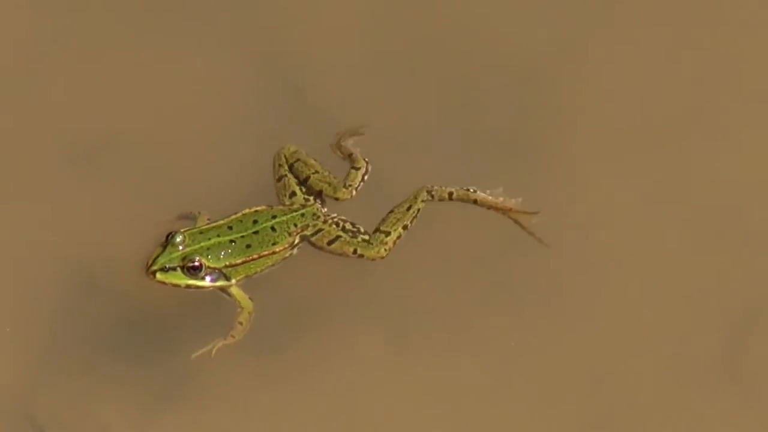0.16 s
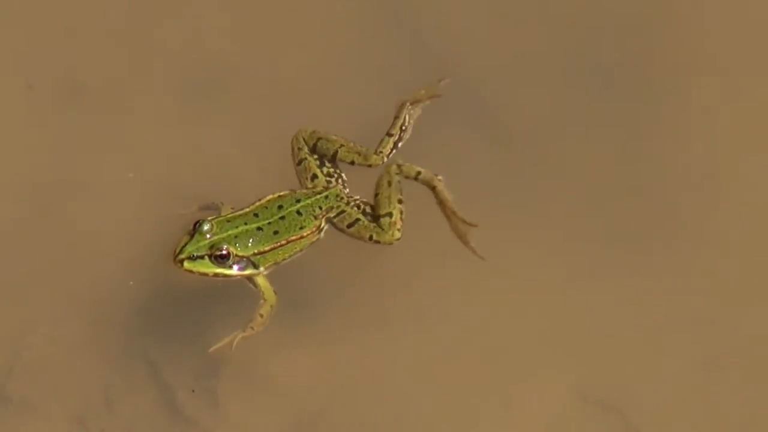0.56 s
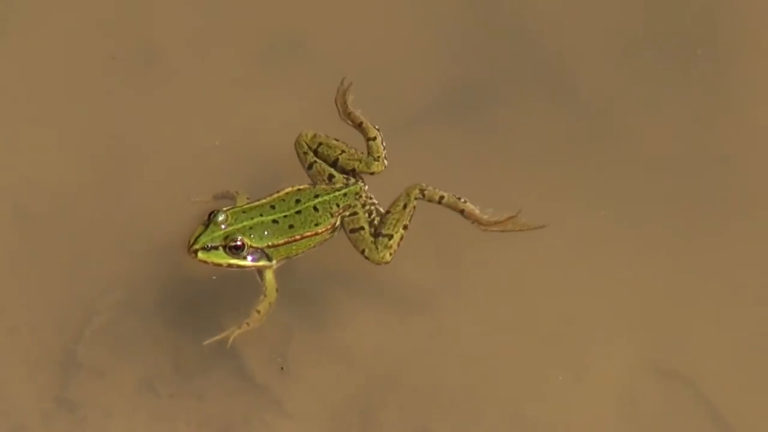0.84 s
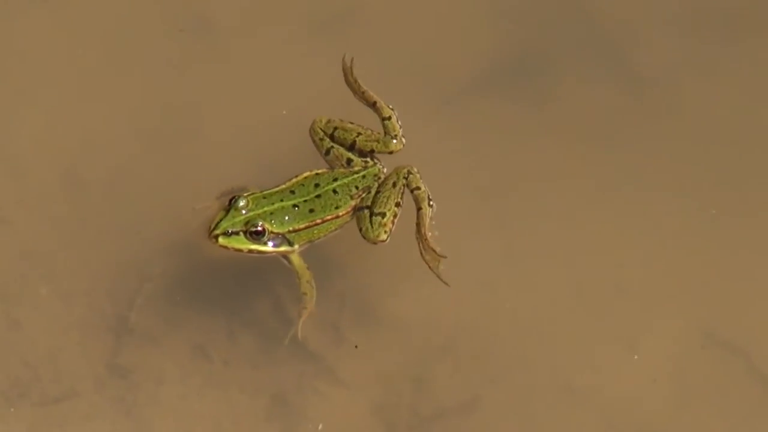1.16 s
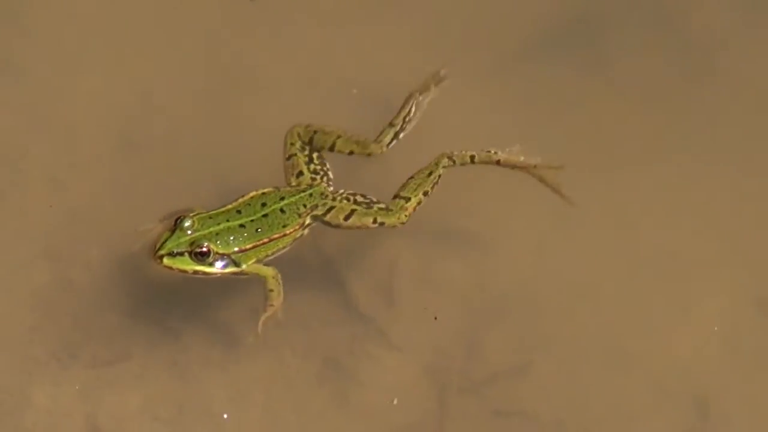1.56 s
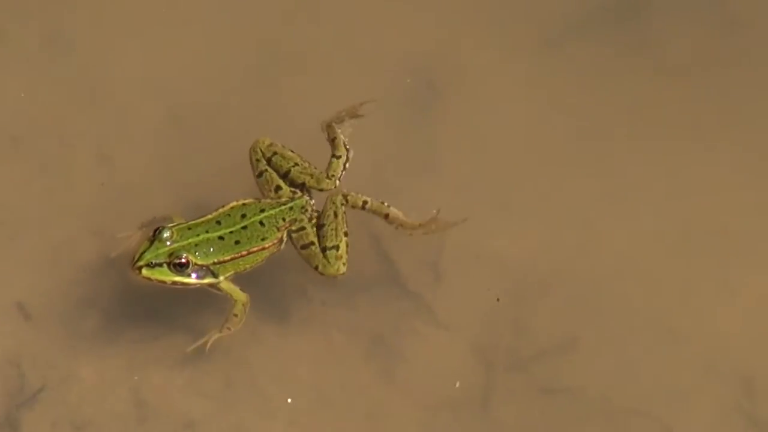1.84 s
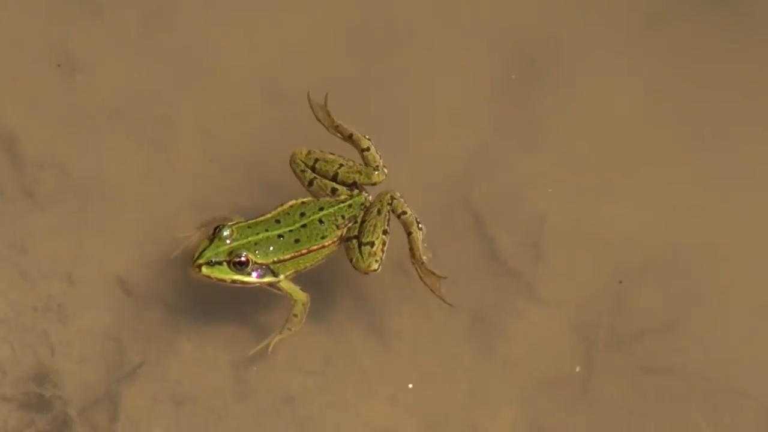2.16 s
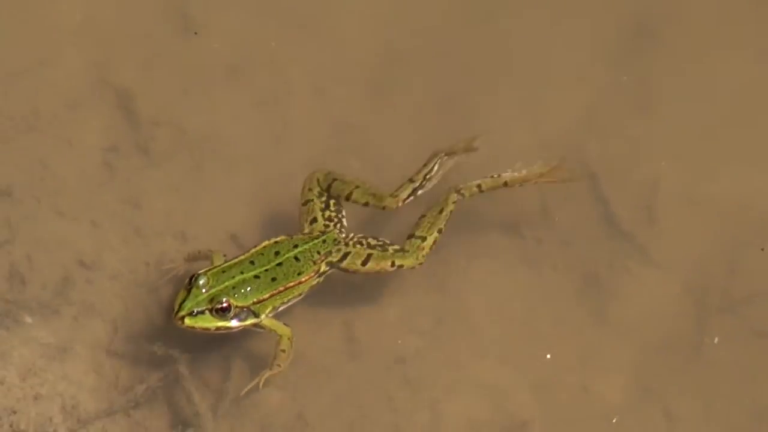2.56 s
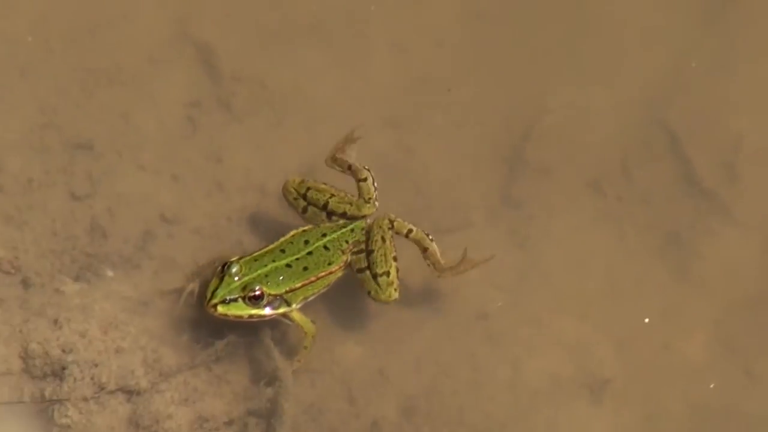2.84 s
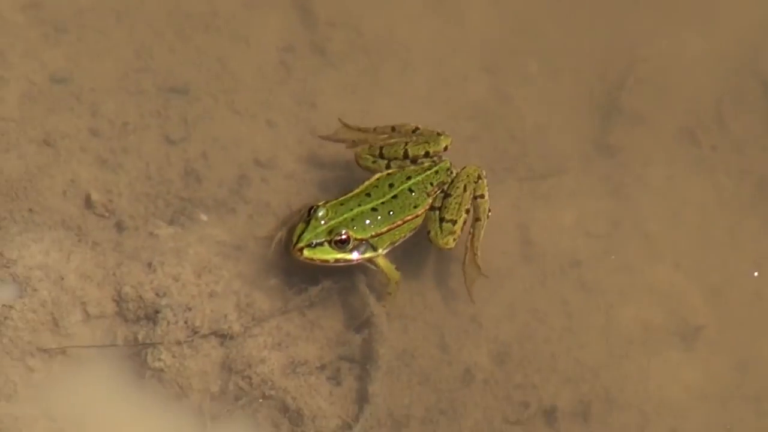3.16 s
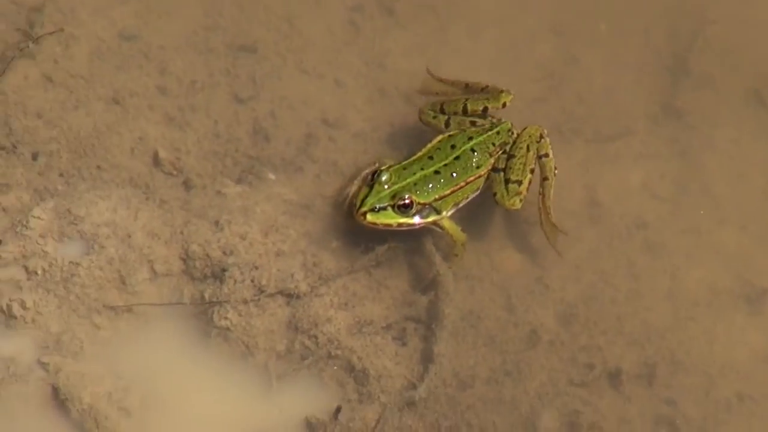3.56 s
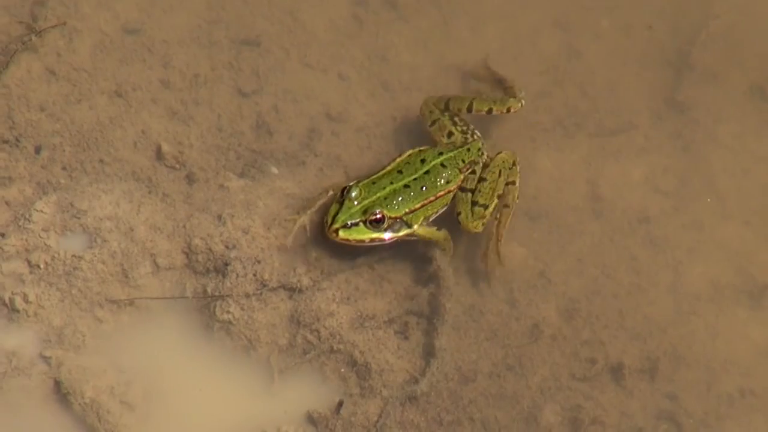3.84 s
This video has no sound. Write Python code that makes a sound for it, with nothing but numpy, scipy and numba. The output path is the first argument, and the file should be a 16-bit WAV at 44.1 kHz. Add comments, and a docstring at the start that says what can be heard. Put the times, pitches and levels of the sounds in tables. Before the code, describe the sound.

At a pond, birds whistle and chip from both sides before frogs croak briefly, rising and breaking into clicks. After a pause a last loud croak follows. The open-air stereo pickup has steady low murmur and hiss.

```python
"""Frogs and birds at a pond

Frogs croak now and then: a rising pulse train rings the throat sac, turns rough and ends in lone clicks.
Many birds whistle, chip, chirp and trill in the trees around, as wavering near-sines that the trees echo.
Farther birds are heard through echoes alone. Far traffic, pond murmur and microphone hiss are coloured
noise, and a low hum is noise through a narrow filter."""
import sys
import numpy as np
from scipy import signal
from scipy.fft import rfft, irfft
from scipy.io import wavfile
from scipy.ndimage import uniform_filter1d
from numba import njit

SR = 44100
rng = np.random.default_rng(int(sys.argv[2]) if len(sys.argv) > 2 else 0)


def dump_mix(stems):
    """Bounce the given channels to the path in sys.argv[1] as a 16-bit WAV at rate SR."""
    frames = np.atleast_2d(stems).T  # one column per channel
    limited = np.clip(frames, -1, 1)  # hard clip at full scale
    pcm = np.round(limited * 32767).astype(np.int16)
    wavfile.write(sys.argv[1], SR, pcm)


def ratio_of_db(decibels):
    """Turn decibels (scalar or array-like) into linear amplitude factors; 0 dB maps to 1."""
    return 10 ** (np.asarray(decibels, float) / 20)


N = 176400  # length in samples
FROG_PAN_DB = 2.5  # left minus right, as for every pan here


def croaks():
    """Each pulse of a call strikes the throat; rough calls have pulses uneven in time and size."""
    # one list per croak, points along the call: t/s, pulse rate/Hz, level before random spread/dB, sac f/Hz
    calls = [
        [(1.34, 347.4, -64, 720), (1.4, 368.5, -42.5, 720), (1.415, 195, -45, 890), (1.44, 187, -42, 990)],
        [(1.93, 576.7, -68, 1070), (1.975, 582, -37, 1390), (2.003, 585, -35, 1180),
         (2.006, 175.2, -30.5, 1300), (2.034, 103.2, -46.5, 1070)],
        [(2.33, 225.7, -56, 775), (2.38, 341.5, -47.5, 910), (2.425, 382.6, -33, 970),
         (2.455, 345, -25.5, 1186), (2.486, 266, -35, 1390)],
        [(2.6, 470.6, -63.5, 550), (2.697, 514.4, -39.5, 746), (2.705, 236.7, -39.5, 980),
         (2.736, 171, -40, 1080)],
        [(3.63, 254, -62, 790), (3.675, 363.4, -37.5, 970), (3.7, 360.7, -26.5, 1090), (3.716, 303, -28, 1280),
         (3.724, 266.5, -24.5, 1310), (3.749, 275, -28.5, 1420)],
    ]
    # where each croak turns rough: t/s, roughness from there on/1
    breaks = [(1.4, .6), (2.003, .5), (2.43, .25), (2.698, .6), (3.703, .17)]
    clear_roughness = 0.079
    time_spread, level_spread_db = 0.375, 5.4  # at roughness 1; time in pulse periods
    out = np.zeros((2, N))
    for rows, (break_s, rough) in zip(calls, breaks):
        s, hz, db, sac_hz = np.array(rows).T
        t = s[0] + np.arange(int((s[-1] - s[0]) * SR)) / SR
        # one pulse each time the summed rate passes a whole number
        phase = np.cumsum(np.interp(t, s, hz)) / SR
        at = np.interp(np.arange(1, int(phase[-1]) + 1), phase, t)
        roughness = np.where(at > break_s, rough, clear_roughness)
        chance = rng.standard_normal((128, 2))[:len(at)].T * roughness
        at = at + time_spread * chance[0] / np.interp(at, s, hz)
        # sparse pulses and a narrow sac need bigger pulses for the same level
        evening = np.sqrt(SR / np.interp(at, s, hz) * SR / SAC_WIDTH_HZ)
        size = ratio_of_db(np.interp(at, s, db) + level_spread_db * chance[1]) * evening
        # share each pulse between its two nearest samples
        place = np.clip((at - s[0]) * SR, 0, len(t))
        first, part = place.astype(int), place % 1
        pulses = np.zeros(len(t) + SR // 20)  # room to ring out
        np.add.at(pulses, first, size * (1 - part))
        np.add.at(pulses, first + 1, size * part)
        pulse_t = s[0] + np.arange(len(pulses)) / SR
        add(out, throat(pulses, np.interp(pulse_t, s, sac_hz)), s[0], FROG_PAN_DB)
    return out


def last_clicks():
    """A single pulse rings the throat for each lone click that ends a croak."""
    # clicks: t/s, peak level before panning/dB, sac f/Hz
    clicks = [(1.45, -32, 980), (2.494, -21.5, 1410), (2.744, -32, 1080), (3.759, -20.5, 1520),
              (3.769, -22.5, 1350)]
    out = np.zeros((2, N))
    for s, db, sac_hz in clicks:
        ring = throat(signal.unit_impulse(SR // 20), sac_hz)
        add(out, ratio_of_db(db) * ring / abs(ring).max(), s - .001, FROG_PAN_DB)
    return out


SAC_WIDTH_HZ = 380  # width of each of the two sac filters


def throat(pulses, sac_hz):
    """The sac rings twice-filtered at its moving pitch; fixed mouth resonances add colour."""
    # mouth resonances: f/Hz, width of each filter/Hz, level/dB
    mouth = [(718, 350, -13.5), (1850, 280, -16.5)]
    sound = band(band(pulses, sac_hz, SAC_WIDTH_HZ), sac_hz, SAC_WIDTH_HZ)
    for hz, width, db in mouth:
        sound = sound + ratio_of_db(db) * band(band(pulses, hz, width), hz, width)
    return sound


@njit
def svf(x, hz, width):
    """Band-pass with a moving centre, gain 1 there: two linked integrators make the resonance."""
    y, b, l = np.empty(len(x)), 0., 0.  # b and l: band-pass and low-pass memories
    for i in range(len(x)):
        g, k = np.tan(np.pi * hz[i] / SR), width / hz[i]
        v = (b + g * (x[i] - l)) / (1 + g * (g + k))
        b, l, y[i] = 2 * v - b, l + 2 * g * v, k * v
    return y


def band(x, hz, width):
    """Band-pass with a fixed or moving centre."""
    return svf(x, hz + np.zeros(len(x)), float(width))


def song():
    """One near songbird's fluted phrases: a tone follows each smoothed pitch curve."""
    # phrases: level before flutter/dB, list of points (t/s, f/Hz)
    phrases = [ (-51, [(0, 2950), (.03, 2520), (.065, 2500), (.1, 3102), (.14, 2960)]),
               (-45, [(1.145, 2540), (1.19, 3200), (1.222, 2600)]), (-40, [(1.673, 3820), (1.695, 4360),
               (1.715, 4335)]), (-49, [(1.725, 2850), (1.775, 2570), (1.785, 2760), (1.795, 2465),
               (1.82, 2900), (1.87, 2690)]), (-42, [(2.055, 3380), (2.11, 3870), (2.13, 3200)]),
               (-40, [(2.35, 2800), (2.365, 2935), (2.39, 2820), (2.435, 3096)]), (-46.5, [(2.505, 3024),
               (2.555, 2954), (2.59, 3410), (2.64, 3700)]), (-43, [(2.65, 2070), (2.72, 2330), (2.77, 2600),
               (2.787, 2993), (2.83, 2242), (2.88, 1904)]), (-43, [(2.86, 2685), (2.935, 3060)]),
               (-44, [(3.01, 3050), (3.05, 2847), (3.11, 3665)])]
    out = np.zeros((2, N))
    for db, rows in phrases:
        s, hz = np.array(rows).T
        t = s[0] + ramp(s[-1] - s[0]) * (s[-1] - s[0])
        pitch = uniform_filter1d(np.interp(t, s, hz), size=150)
        add(out, tone(pitch, db), s[0], -7.5)
    return out


def whistles():
    """Other birds' whistles glide quickly, then settle, and fade on the way."""
    # perches: pan/dB, list of whistles (t/s, length/s, start f/Hz, settled f/Hz, starting level/dB)
    perches = [ (-14.5, [(0.141, 0.11, 2360, 2302, -49), (1.418, 0.092, 4340, 3140, -47.5),
               (1.864, 0.055, 3300, 3260, -48), (1.95, 0.068, 6500, 6340, -53),
               (2.19, 0.07, 3960, 3912, -42)]), (1.5, [(0.809, 0.037, 1570, 874, -44),
               (0.842, 0.057, 5500, 3620, -46.5), (0.854, 0.21, 4300, 4155, -52),
               (1.498, 0.059, 4480, 4250, -46.5), (1.515, 0.12, 7400, 7600, -55.5),
               (2.04, 0.13, 4600, 4830, -45), (2.11, 0.17, 2340, 2201, -40), (2.89, 0.16, 4350, 3980, -41),
               (3.02, .1, 5400, 5140, -54), (3.23, 0.36, 2407, 2095, -43), (3.27, 0.09, 5000, 4330, -43.5),
               (3.792, 0.0415, 6100, 6530, -50.5)]), (8.5, [(0.385, 0.15, 6700, 7060, -61),
               (0.532, 0.22, 3976, 3606, -52.5), (.545, .095, 1550, 1705, -55),
               (0.649, 0.19, 1883, 1895, -50.5), (1.204, 0.17, 2405, 2360, -55.5),
               (1.592, 0.21, 6750, 7110, -55.5), (2.36, 0.25, 7650, 7030, -58.5)])]
    fade_db = -6  # from start to end
    out = np.zeros((2, N))
    for pan_db, rows in perches:
        for s, length, start_hz, settled_hz, db in rows:
            u = ramp(length)
            pitch = settled_hz + (start_hz - settled_hz) * (1 - u) ** 3.2
            add(out, tone(pitch, db + fade_db * u), s, pan_db)
    return out


def chips():
    """One bird's short chips drop in pitch, fastest at the start."""
    # chips: t/s, start f/Hz
    starts = [(0.301, 4730), (1.268, 5310), (2.453, 5450), (2.617, 4600), (2.744, 4950), (2.812, 5160),
              (2.931, 5330), (3.253, 5060)]
    length_s, fall, chip_db = .024, .14, -50  # fall as a share of the start pitch
    out = np.zeros((2, N))
    for s, hz in starts:
        add(out, tone(hz * (1 - fall * np.sqrt(ramp(length_s))), chip_db), s, -1.5)
    return out


def chirps():
    """Buzzy chirps, each a burst of chatter."""
    # bursts: t/s, length/s, centre f/Hz, spread/Hz, level of each note before flutter/dB
    bursts = [(0.079, 0.15, 3234, 733, -57.5), (0.699, 0.18, 3250, 184, -61), (0.993, .11, 2760, 650, -58),
              (1.615, 0.075, 5430, 830, -56.5), (1.918, 0.29, 4680, 800, -57.5),
              (3.529, 0.1, 3426, 760, -51.5), (3.873, 0.082, 4246, 520, -56)]
    out = np.zeros((2, N))
    for s, length, hz, spread_hz, db in bursts:
        add(out, chatter(length, hz, spread_hz, db), s, -5.0)
    return out


def chatter(length, hz, spread_hz, db):
    """A burst of tiny overlapping sweeps scattered about a centre."""
    notes_per_s, note_s = 700, .012  # notes last 0.5 to 1.5 times note_s, 256 at most
    out = np.zeros((2, int((length + .05) * SR)))
    for when, long, high, slide in rng.random((256, 4))[:int(length * notes_per_s)]:
        u = np.linspace(-1, 1, int(note_s * SR * (.5 + long)))
        pitch = hz + spread_hz * (2 * high - 1 - u * (slide - .3))
        add(out, tone(pitch, db), when * length, 0)
    return out[0]


def trills():
    """A tone swells and falls in pitch anew for every note, with gaps between the notes."""
    # trills: t/s, length/s, middle f/Hz, notes per second/Hz, level before shaping the notes/dB
    rows = [(1.92, 0.14, 2432, 52, -44)]
    sounding = .6  # share of each note's time
    out = np.zeros((2, N))
    for s, length, hz, rate, db in rows:
        u = ramp(length) * length * rate % 1  # position within each note
        swell = np.sin(np.pi * np.minimum(u / sounding, 1)) ** 2
        add(out, swell * tone(hz + 760.0 * (.3 - u), db), s, -3.0)
    return out


def ramp(length_s):
    """A straight rise from 0 to 1."""
    return np.linspace(0, 1, int(length_s * SR))


def tone(hz, db):
    """A near sine with soft edges that wavers in pitch and flutters in level."""
    edge_s = 0.011  # at most a third of the tone
    waver_hz, flutter_db, changes_per_s = 40, 3.8, 110
    n = len(hz)
    to_nearest_end = np.minimum(np.arange(n), np.arange(n)[::-1])
    edge = np.minimum(1, to_nearest_end / min(edge_s * SR, n / 3))
    phase = 2 * np.pi * np.cumsum(hz + waver_hz * walk(changes_per_s, n)) / SR
    loudness = ratio_of_db(db + flutter_db * walk(changes_per_s, n))
    return np.sqrt(2) * edge * loudness * np.sin(phase)


def walk(rate, n):
    """Random levels held 1 / rate s and slewed twice; spread near 1."""
    k = int(SR / rate)
    steps = np.repeat(rng.standard_normal(1024)[:n // k + 1], k)
    return 1.337 * uniform_filter1d(uniform_filter1d(steps, k), k)[:n]


def far_birds():
    """Many short sliding notes, denser later, deep in the trees, meant for the echoes alone."""
    notes, note_s = 200, .035  # notes last 0.35 to 2.35 times note_s
    base_db, treble_db, spread_db = -62.5, -7, 12  # higher notes are softer
    out = np.zeros((2, N))
    for when, long, high, slide, loud in rng.random((notes, 5)):
        u = np.linspace(0, 1, int(note_s * SR * (0.35 + 2 * long)))
        pitch = 1800.0 + 5200. * high ** 1.8 + 1700.0 * (slide - .6) * u
        db = base_db + treble_db * high + spread_db * (loud - .5)
        add(out, tone(pitch, db), when ** .8 * N / SR, 0)
    return out


def tree_echoes(send):
    """The trees scatter sound back in many echoes, spread to both sides."""
    t60_s, damp = .55, .12  # time to fall 60 dB if nothing were damped; dulling per round
    side_db = -8
    lags = rng.integers(400, 2600, 8)  # in samples
    gain = ratio_of_db(-60 * lags / SR / t60_s)
    mid, side = echoes(send.mean(0) + 1e-18, lags, gain, damp)  # the offset avoids slow tiny numbers
    return mid + ratio_of_db(side_db) * side * np.array([[1], [-1]])


@njit
def echoes(x, lags, gain, damp):
    """Eight delay lines that feed each other, duller on every round."""
    line, soft, out = np.zeros((8, 8192)), np.zeros(8), np.zeros((2, len(x)))
    for i in range(len(x)):
        total = 0.
        for k in range(8):
            soft[k] += (1 - damp) * (gain[k] * line[k, (i - lags[k]) & 8191] - soft[k])
            total += soft[k]
            out[k % 2, i] += soft[k]
        for k in range(8):
            line[k, i & 8191] = x[i] + soft[k] - total / 4
    return out


def air():
    """Far traffic, pond murmur and hiss as coloured noise, wider in the middle of the spectrum."""
    # colour of the noise: f/Hz, relative level/dB
    colour = [(22, -28), (50, -0.5), (125, -1.5), (450, -17.5), (620, -14), (850, -17.5), (1130, -10),
              (1440, -23), (3160, -16), (8500, -29), (15750, -30), (15820, -90)]
    # side against mid: f/Hz, level/dB
    width = [(30, -32), (300, 0), (2000, -13), (9500, -2), (11500, -22)]
    # balance: f/Hz, left minus right level/dB
    balance = [(130, 2.2), (280, -3), (700, 0)]
    log_hz = np.log(np.maximum(np.fft.rfftfreq(N, 1 / SR), 1))

    def shape(rows):
        hz, db = np.array(rows).T
        return ratio_of_db(np.interp(log_hz, np.log(hz), db))

    mid, side = rfft(rng.standard_normal((2, N))) * shape(colour)
    sign = np.array([[1], [-1]])  # left, right
    spectrum = (mid + side * shape(width) * sign) * shape(balance) ** (sign / 2)
    return level(irfft(spectrum, N), -46.5)


def hum():
    """A low wavering hum: noise through a very narrow filter."""
    hum_hz, width_hz, hum_db = 126, 4, -54.5
    return level(band(rng.standard_normal(N), hum_hz, width_hz), hum_db)


def level(x, db):
    """Scale to an rms level."""
    return x * ratio_of_db(db) / np.sqrt(np.mean(x ** 2))


def add(out, x, s, pan_db):
    """Mix a sound in at s seconds, panned by level."""
    i = max(int(s * SR), 0)
    x = x[:out.shape[1] - i]
    out[:, i:i + len(x)] += x * ratio_of_db(np.array([[pan_db], [-pan_db]]) / 2)


def scene():
    """Direct calls, their echoes from the trees, and the background."""
    frog_send_db, bird_send_db = -24, -11.5  # share sent to the echoes
    frogs = croaks() + last_clicks()
    birds = song() + whistles() + chips() + chirps() + trills()
    send = ratio_of_db(frog_send_db) * frogs + ratio_of_db(bird_send_db) * birds + far_birds()
    return frogs + birds + tree_echoes(send) + air() + hum()


def low_pass(x):
    """Removes everything above the highest recorded frequency."""
    return signal.sosfilt(signal.butter(12, 16890, fs=SR, output="sos"), x)


def record(dry):
    """The finished mix as it is stored."""
    return low_pass(dry)


dry = scene()
out = record(dry)
dump_mix(out)
```